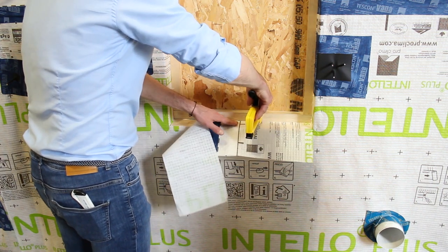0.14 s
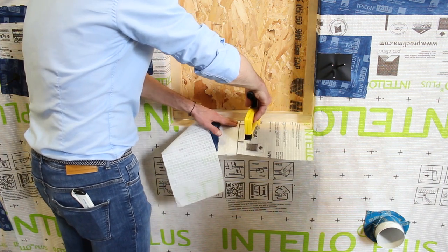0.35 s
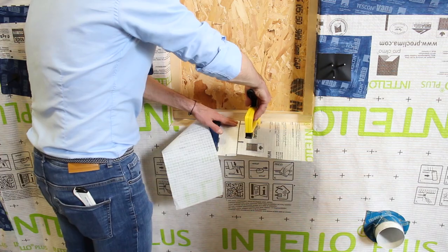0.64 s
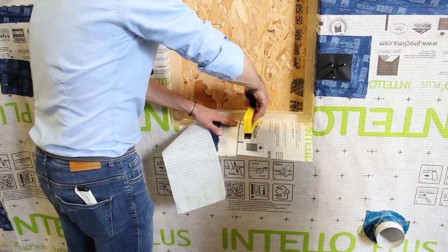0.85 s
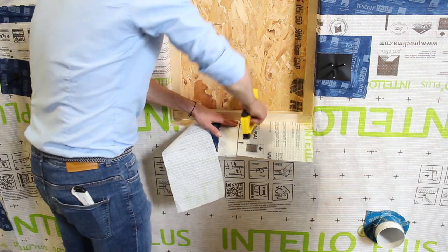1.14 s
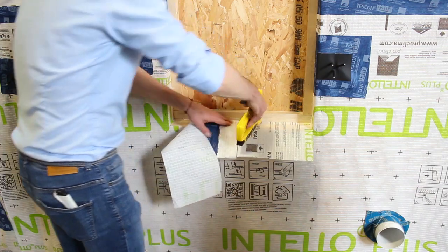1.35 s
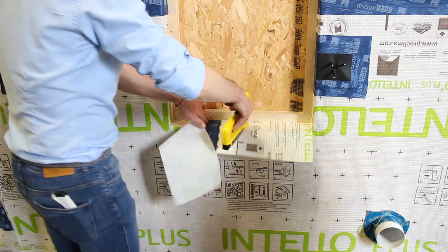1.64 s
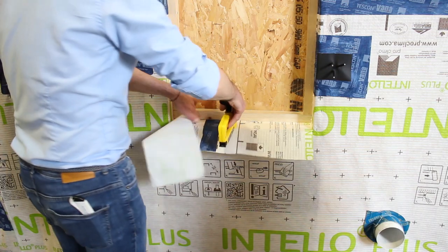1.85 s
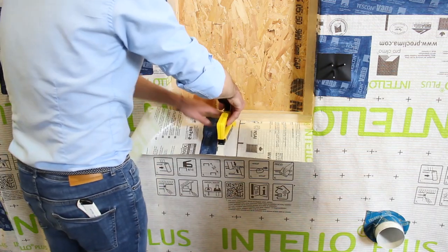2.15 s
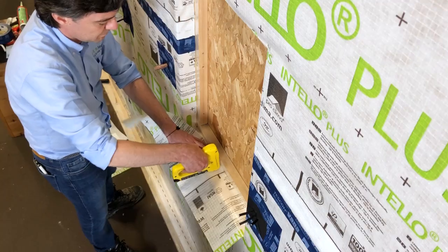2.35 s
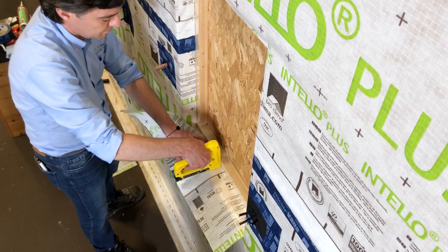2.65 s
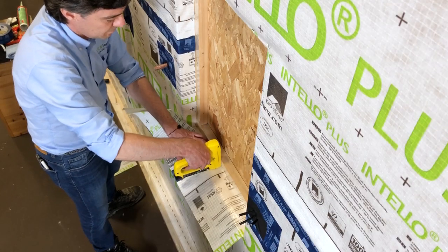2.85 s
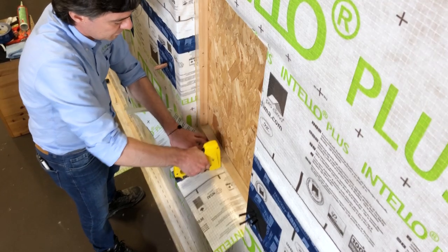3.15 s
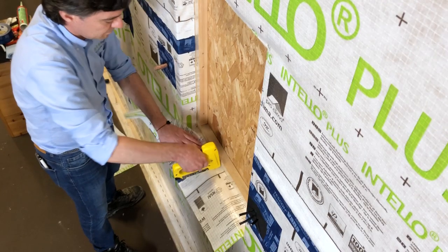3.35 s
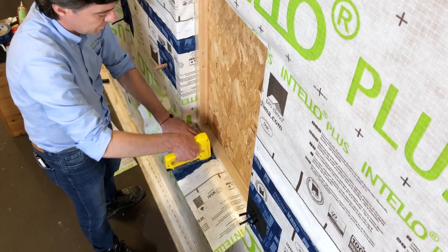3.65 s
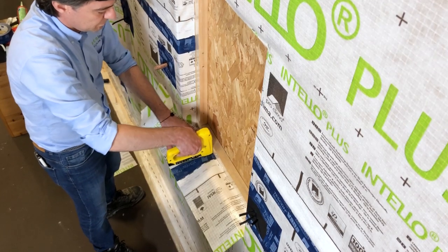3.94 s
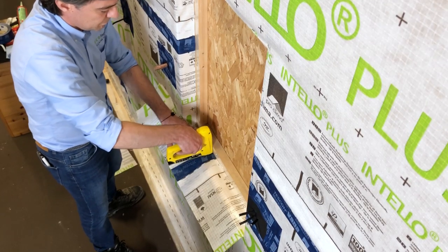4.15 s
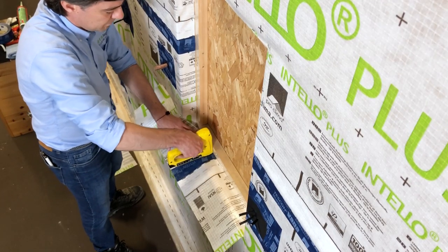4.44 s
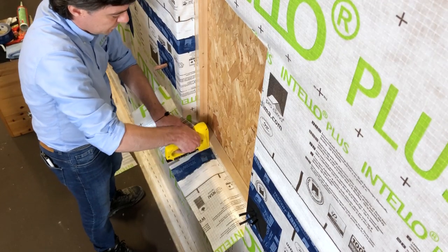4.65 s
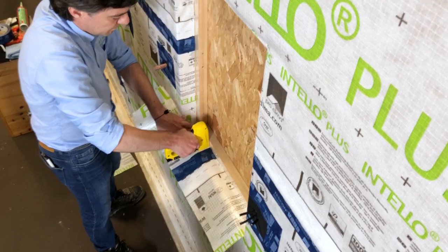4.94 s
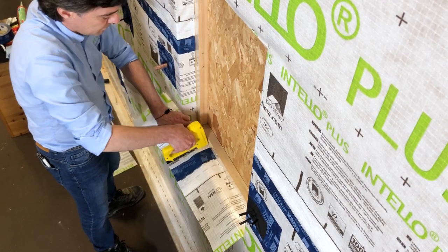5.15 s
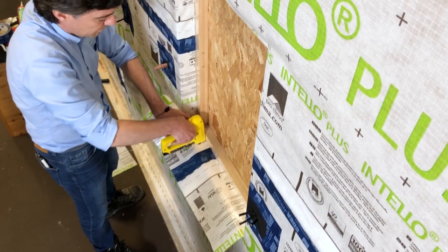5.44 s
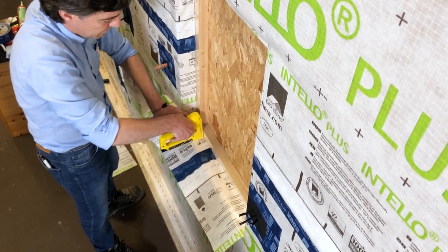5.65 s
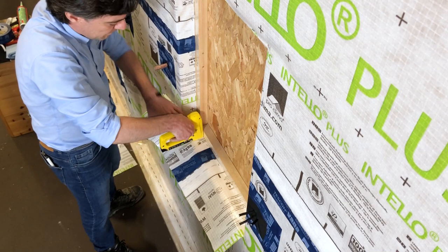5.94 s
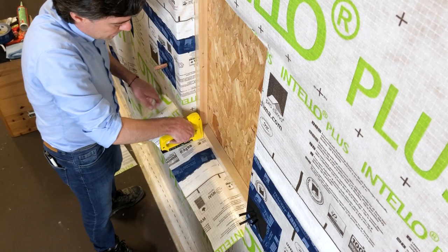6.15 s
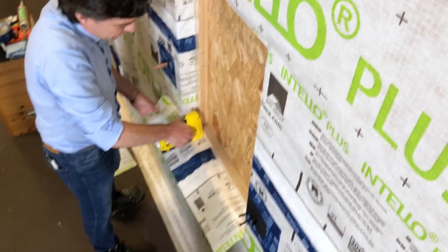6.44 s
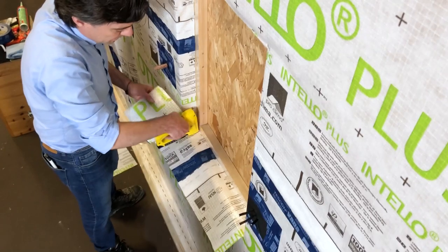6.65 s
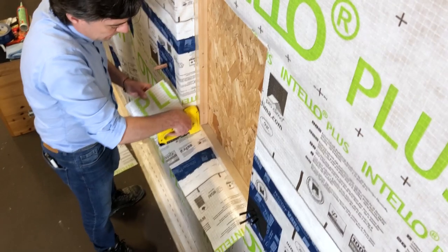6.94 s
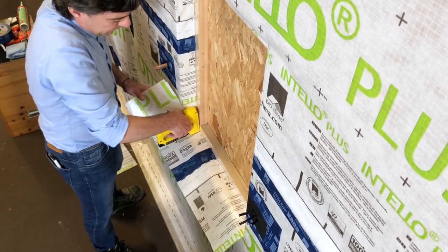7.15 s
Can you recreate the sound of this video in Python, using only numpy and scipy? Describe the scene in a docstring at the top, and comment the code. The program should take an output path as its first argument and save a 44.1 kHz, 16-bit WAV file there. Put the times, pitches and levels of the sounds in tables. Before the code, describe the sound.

Four hard, overloaded staple gun shots crack into timber in a bare echoing room, with small ticks, knocks and rustling membrane between over faint hum.

```python
"""A slow machine hums behind the walls of a bare, echoing room; it later takes load and slows.
A hand staple gun ticks and knocks on a timber frame, then fixes a membrane to it with four overloading shots.
Every stroke runs alike: the squeeze seats the gun, the spring catch slips, the driver fires, the handle ticks back.
Steel modes sing on after each shot; between shots the gun knocks on the wood and the membrane rustles.
Blows are decaying modes and shaped noise bursts, the membrane is noise and crinkles, the hum a row of sines."""
import sys
import numpy as np
from scipy import signal
from scipy.fft import rfft, irfft
from scipy.io import wavfile
from scipy.ndimage import uniform_filter1d

SR = 44100
rng = np.random.default_rng(int(sys.argv[2]) if len(sys.argv) > 2 else 0)


def put_to_file(sound):
    """Save the sound as 16-bit audio at rate SR, in the file named by the first command-line argument."""
    columns = np.atleast_2d(sound).T  # one column per channel
    safe = np.clip(columns, -1, 1)
    whole_steps = np.round(safe * 32767)
    wavfile.write(sys.argv[1], SR, whole_steps.astype(np.int16))


N = 321489

# The staples; each spot on the frame has its own cluster of steel overtones and its own few notes.
# Each row: time in s, force in dB, lead of the catch in s, thump of the wall in dB, cluster centre in Hz,
# cluster level in dB, notes as (Hz, dB, t60 in s).
STAPLES = [(1.2075, -5.5, 0.015, -30, 2514, -.5, [(465, -.5, .08), (827, -7.5, 0.095), (1850, -11, .06)]),
           (3.3104, -5, 0.014, -24, 2400, -1.54, [(335, -9, .14), (560, 1.5, .071), (1835, -9.5, .1),
           (930, -9, .04)]), (5.0230, -6, .0232, -8, 2680, -.5, [(319, -3, .17), (400, -8.5, 0.087),
           (1430, -10, .09)]), (6.4794, -6.5, 0.031, -9, 1850, -1.8, [(322, -8, 0.13), (640, -4, .04),
           (1244, 1, .05), (1010, -5, .035)])]
# The boarded wall flexing. Each row: frequency in Hz, level in dB, t60 in s.
WALL_MODES = [(88, -13, 0.15), (117, -3.5, 0.09), (183, -9, 0.3)]

SQUEEZE_S = 0.06  # the squeeze comes this long before the catch: the nose bumps the wood, the handle ticks
AGE = np.arange(SR // 2) / SR  # time since a blow (s)


def amp(db):
    """Decibels to gain."""
    return 10 ** (np.asarray(db) / 20)


def unit(x):
    """Scales to rms 1."""
    return x / np.sqrt(np.mean(x ** 2) + 1e-20)


def read(points, hz):
    """Reads a table on a log-frequency axis."""
    f, value = np.transpose(points)
    return np.interp(np.log(hz + 1), np.log(f + 1), value)


def add(mix, s, sound):
    """Mixes a sound in at time s."""
    part = mix[max(round(s * SR), 0):][:len(sound)]
    part += sound[:len(part)]


def colour(x, spectrum):
    """Gives a signal a spectrum, at rms 1."""
    gain = amp(read(spectrum, np.fft.rfftfreq(len(x), 1 / SR)))
    return unit(irfft(rfft(x) * gain, len(x)))


def fade(t60):
    """Exponential decay after a blow, 60 dB in t60 seconds."""
    return np.exp(-np.log(1000) * AGE / t60)


def ring(modes):
    """Damped modes set going by one blow, neighbours in opposite directions."""
    out = np.zeros(len(AGE))
    for k, (hz, db, t60) in enumerate(modes):
        out += (-1) ** k * amp(db) * fade(t60) * np.sin(2 * np.pi * hz * AGE)
    return out


def burst(spectrum, t60, uneven=.7):
    """A dense cluster of short-lived modes of uneven strength under a smooth spectrum."""
    z = rfft(rng.standard_normal(len(AGE)) * fade(t60))
    # a power below 1 evens out the strengths of the modes
    modes = np.exp(1j * np.angle(z)) * abs(z) ** uneven
    gain = amp(read(spectrum, np.fft.rfftfreq(len(AGE), 1 / SR)))
    cluster = irfft(modes * gain, len(AGE))
    # a shorter burst carries less energy
    return unit(cluster * fade(8 * t60)) * np.sqrt(np.mean(fade(t60) ** 2))


def room(x, wet_db=-5.0, near_db=-6, far_wall=0.033, wall_db=3, wall_width=0.016, blur_hz=95):
    """A short sound and its echoes: thin ones from the frame close by, the far walls, then a diffuse decay."""
    # Decay of the room. Each row: frequency in Hz, t60 in s.
    decay_t60 = [(100, .5), (300, .65), (600, .8), (1500, .84), (2600, .8), (5000, .7), (9000, .56),
                 (15000, .43)]
    # Colour of the echo. Each row: frequency in Hz, level in dB.
    echo_db = [(100, -6.5), (300, -3.5), (600, -2.5), (1200, -1.5), (2600, -2.5), (6000, -4), (10000, -3.5),
               (15000, -6.5)]
    size = SR + SR // 2
    t = np.arange(size) / SR
    # countless paths scramble the echo into noise that keeps only the broad colour of the sound
    power = uniform_filter1d(abs(rfft(x, size)) ** 2, int(blur_hz * size / SR) + 1)
    diffuse = irfft(rfft(rng.standard_normal(size)) * np.sqrt(abs(power)), size)
    # every band dies away at its own rate
    hz, age, z = signal.stft(diffuse, SR, nperseg=512)
    decay = np.exp(-np.log(1000) * age / read(decay_t60, hz)[:, None])
    z = z * amp(read(echo_db, hz)[:, None]) * decay
    tail = signal.istft(z, SR, nperseg=512)[1][:size] / np.sqrt(.04 * SR)
    # the early echoes build up in two steps, with a swell just after the far walls answer
    build = np.interp(t, [.003, .008, far_wall - .008, far_wall], [0, amp(near_db), amp(near_db), 1])
    build = build * amp(wall_db * np.exp(-((t - far_wall - .008) / wall_width) ** 2))
    out = amp(wet_db) * build * tail
    add(out, 0, x)
    return out


def machine(waver=0.14, smear=.19):
    """Sines at multiples of a slow rotation throb together; the two strongest fade out once and return."""
    # Steadier orders. Each row: multiple of the rotation, level in dB.
    steady_orders = [(1, -74.5), (2, -66.5), (3, -57.5), (4, -60), (5, -60.5), (6, -73), (8, -56.5),
                     (9, -60), (11, -62), (12, -77), (13, -72.5), (15, -71), (17, -76)]
    # Strongest orders, sinking slowly. Each row: multiple of the rotation, starting level in dB,
    # drift in dB per s, time of the fade in s, half-width of the fade in s.
    fading_orders = [(7, -45.5, -0.48, 3.75, 1.2), (10, -52, -0.47, 4.45, 0.4)]
    machine_hz, load_at_s, sag_hz_per_s = 22.0, 5.8, .33  # it runs steadily, then takes load and slows
    t = np.arange(N) / SR
    turns = np.cumsum(machine_hz - sag_hz_per_s * np.maximum(t - load_at_s, 0)) / SR
    orders = [(order, amp(db)) for order, db in steady_orders]
    for order, db, db_per_s, fade_at, width in fading_orders:
        dip = abs(t - fade_at) / np.hypot(t - fade_at, width)
        orders.append((order, amp(db + db_per_s * t) * dip))
    knots = np.linspace(0, t[-1], num=20)
    out = np.zeros(N)
    for order, gain in orders:
        drift = 1 + waver * np.interp(t, knots, rng.standard_normal(len(knots)))
        # the walls delay each order differently, which smears the beats into a hum
        cycles = order * turns - smear * order ** 2
        out += gain * drift * np.sin(2 * np.pi * cycles)
    return np.sqrt(2) * out


def still_air(air_db=-56):
    """Steady noise, strongest in the bass, for the air of the room."""
    # Each row: frequency in Hz, level in dB per Hz.
    air_spectrum = [(20, 3), (60, 6.5), (110, -2), (170, 4), (300, -0.5), (500, -3), (1000, -5.5),
                    (1600, -10.5), (2800, -21), (5000, -24), (10000, -29), (16000, -37.5)]
    return amp(air_db) * colour(rng.standard_normal(N), air_spectrum)


def clicks(catch_t60=.028, slip=.0042, slip_db=-7, tick_t60=0.037, tick_rise=.0006):
    """The catch lets go in two noise bursts; handle and handling ticks each have one broad resonance."""
    # Clear ticks as the gun is moved and set down. Each row: time in s, level in dB, centre in Hz.
    handling_ticks = [(0.9724, -49, 5360), (2.064, -56, 5030), (2.9521, -54, 6010), (4.185, -53, 4900),
                      (4.5372, -50, 9850), (5.4445, -29.5, 2970), (5.743, -42.5, 2360),
                      (6.008, -46.5, 1680), (6.328, -41.5, 1600), (6.799, -39.5, 4820), (6.924, -48, 8220)]
    # The spring catch. Each row: frequency in Hz, level in dB per Hz.
    catch_spectrum = [(200, -14), (1200, -6), (2200, 3), (5000, 0), (7500, -3.5), (11000, -10),
                      (16000, -20.5)]
    catch_db, usual_lead_s = -28.5, .02  # level at the usual lead; a quicker squeeze is louder
    squeeze_db, return_s, return_db, handle_hz = -55, .23, -44, 8500  # handle springs back after the shot
    stray_per_s, stray_db, stray_spread_db, stray_hz = 2.5, -63, 2.5, 7000  # fainter ticks at random
    out, ticks = np.zeros(N), list(handling_ticks)
    for s, _, catch_lead, *_ in STAPLES:
        catch = s - catch_lead
        strength = amp(catch_db) * usual_lead_s / catch_lead
        add(out, catch, strength * burst(catch_spectrum, catch_t60))
        add(out, catch + slip, strength * amp(slip_db) * burst(catch_spectrum, catch_t60))
        ticks.append((catch - SQUEEZE_S, squeeze_db, handle_hz))
        ticks.append((s + return_s, return_db, handle_hz))
    for at in np.flatnonzero(rng.random(N) < stray_per_s / SR):
        ticks.append((at / SR, stray_db + stray_spread_db * rng.standard_normal(), stray_hz))
    for s, db, hz in ticks:
        resonance = [(hz / 10, -18), (hz / 2, -7), (hz, 0), (hz * 2, -16), (hz * 4, -38)]
        tick = burst(resonance, tick_t60)
        add(out, s, amp(db) * tick * (1 - np.exp(-AGE / tick_rise)))
    return out


def knocks(scuff_db=-3, wall_db=-12, swell=0.0018, settle=.024, settle_db=-7, settle_hz=450):
    """Soft blows ring timber and wall, each with a duller second contact; every squeeze seats the nose."""
    # Dull knocks of gun and hand on the timber. Each row: time in s, level in dB, brightness as a cut-off in Hz.
    timber_knocks = [(0.9744, -44, 690), (2.766, -34.5, 480), (4.077, -23.5, 1498), (4.785, -44.5, 800),
                     (5.44, -30.5, 699.6), (5.539, -39, 400), (6.3256, -42.5, 900), (6.7178, -28, 552),
                     (7.049, -37, 555)]
    # Timber modes. Each row: frequency in Hz, level in dB, t60 in s.
    wood_modes = [(65, -17, .3), (200, -15, 0.077), (285, -1, .09), (347, -.5, 0.078), (432, -3, 0.14),
                  (520, -5.5, 0.08), (790, -4, 0.051), (1150, -9.5, 0.041), (1810, -13.5, .025)]
    seat_db, seat_hz = -44.5, 1000
    scuff_spectrum = [(60, -8), (350, 0), (1500, -2), (3000, -14), (9000, -30)]  # (Hz, dB per Hz)
    out = np.zeros(N)
    timber = ring(wood_modes) + amp(wall_db) * ring(WALL_MODES)
    seatings = [(s - catch_lead - SQUEEZE_S, seat_db, seat_hz) for s, _, catch_lead, *_ in STAPLES]
    for s, db, hz in timber_knocks + seatings:
        knock = np.zeros(len(AGE))
        # the gun settles after the first contact
        for delay, drop_db, edge_hz in [(0, 0, hz), (settle, settle_db, settle_hz)]:
            blow = timber + amp(scuff_db) * burst(scuff_spectrum, .06)
            # the softer the contact, the fewer high modes sound
            b, a = signal.butter(2, edge_hz, fs=SR)
            contact = signal.lfilter(b, a, blow * (1 - np.exp(-AGE / swell)))
            add(knock, delay, amp(drop_db) * contact)
        add(out, s, amp(db) * room(knock))
    return out


def shots(crack_db=10, crack_t60=0.041, rebound=.005, rebound_db=-4, ring_db=3, note_db=7.5, cluster_db=3,
          cluster_width=1.09, cluster_t60=.1, slide_db=-12, lead=.002, swell=0.0031, bite=0.00041):
    """The driver slides down, cracks onto the staple and rebounds; gun, frame and wall ring."""
    # Gun and frame together. Each row: frequency in Hz, level in dB, t60 in s.
    frame_modes = [(288, -15, 0.19), (347.5, -15, 0.27), (415.5, -7.5, 0.14), (493, -8, 0.14),
                   (590, -9, 0.071), (800, -12, 0.076), (1240, -13.5, 0.1), (1446, -11.5, 0.055),
                   (1636, -11, .06), (1937, -11.5, 0.085), (2050, -10, 0.076), (2290, -9.5, 0.073),
                   (2750, -10, .06), (3210, -15, 0.035), (3650, -13.5, 0.03)]
    # The steel driver hitting the staple. Each row: frequency in Hz, level in dB per Hz.
    crack_spectrum = [(30, -18), (200, -11), (450, 2.5), (750, -1.5), (1000, -2.5), (1600, 1), (2700, -2.5),
                      (3800, -4), (6000, -10.5), (9500, -15), (12000, -23), (16000, -25)]
    out = np.zeros(N)
    for s, force_db, _, thump_db, high_hz, high_db, notes in STAPLES:
        body = amp(ring_db) * ring(frame_modes) + amp(note_db) * ring(notes)
        body = body + amp(thump_db) * ring(WALL_MODES)
        band = high_hz * cluster_width ** np.array([-4, -1, 1, 4])
        cluster = list(zip(band, [-39.5, 0, -1.0, -40.0]))
        steel = amp(cluster_db + high_db) * burst(cluster, cluster_t60)
        # the slide has one level whatever the force of the shot
        add(out, s - lead, amp(slide_db) * burst(crack_spectrum, 0.075))
        # the ringing builds up while the staple sinks in
        for part in (body, steel):
            add(out, s, amp(force_db) * room(part * (1 - np.exp(-AGE / swell))))
        for delay, db in [(0, 0), (rebound, rebound_db)]:
            crack = burst(crack_spectrum, crack_t60) * (1 - np.exp(-AGE / bite))
            add(out, s + delay, amp(force_db + crack_db + db) * room(crack))
    return out


def spring(level_db=-35, blur_hz=80):
    """After each shot the steel sings on faintly in bunches of close modes that outlast the room."""
    # Each row: factor on the cluster's centre frequency, level in dB, t60 in s.
    steel_bunches = [(1, -0.5, 1.3), (1.055, -4, 1.2), (.87, -7.5, .95)]
    out = np.zeros(N)
    t = np.arange(2 * SR) / SR
    for s, _, _, _, hz, *_ in STAPLES:
        for factor, db, t60 in steel_bunches:
            bunch = factor * hz + blur_hz * rng.standard_normal(size=10)
            tone = unit(sum(np.sin(2 * np.pi * (f * t + rng.random())) for f in bunch))
            add(out, s, amp(level_db + db) * np.exp(-np.log(1000) * t / t60) * tone)
    return out


def membrane(crinkles_per_s=450, spread_db=2.5, slide_share=.75):
    """The film hisses as it slides and gives off tiny crinkles of uneven size."""
    # Moves of the film under the hand. Each row: start in s, length in s, level in dB.
    moves = [(1.6, .52, -50.5), (2.33, .13, -65), (2.55, 0.12, -62.5), (3.6, 0.51, -55),
             (4.44, 0.28, -57.5), (4.71, 0.098, -55), (5.721, 0.11, -55.5), (6.31, .13, -59),
             (6.891, 0.27, -54.5)]
    # Each row: frequency in Hz, level in dB per Hz.
    film_spectrum = [(200, -5), (500, 3.5), (1700, 4), (3000, -3), (5000, -6), (7000, -14.5), (10000, -18),
                     (16000, -31)]
    stroke = np.zeros(N)
    for s, length, db in moves:
        add(stroke, s, amp(db) * np.sqrt(np.hanning(int(length * SR)).clip(0)))
    sizes = amp(spread_db * np.minimum(rng.exponential(1, N), 4))
    hits = sizes * (rng.random(N) < crinkles_per_s / SR)
    # each crinkle is a puff of noise dying away in about half a millisecond
    puffs = signal.lfilter([1], [1, -np.exp(-2000 / SR)], hits)
    crinkles = rng.standard_normal(N) * puffs
    return stroke * colour(unit(crinkles) + slide_share * rng.standard_normal(N), film_spectrum)


def scene():
    """Clicks and membrane share one room echo; knocks and shots bring their own, over hum and still air."""
    echo = room(np.ones(1))
    handling = signal.fftconvolve(clicks() + membrane(), echo)[:N]
    mix = machine() + still_air() + handling + knocks() + shots() + spring()
    return mix[None]


def record(dry):
    """Whatever overloads the recorder clips flat; then a low-pass limits the band."""
    edge_hz = 16050
    clipped = np.clip(dry, -1, 1)
    low_pass = signal.firwin(511, edge_hz, window=("kaiser", 8), fs=SR)
    return signal.oaconvolve(clipped, low_pass[None], "same")


dry = scene()
out = record(dry)
put_to_file(out)
```